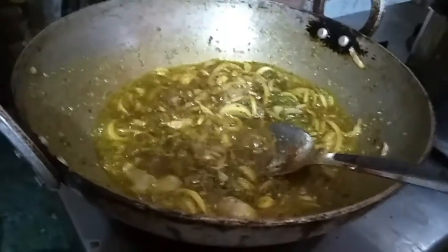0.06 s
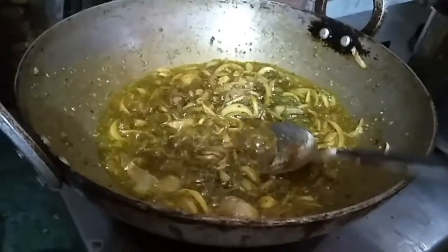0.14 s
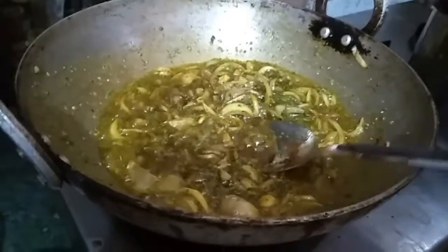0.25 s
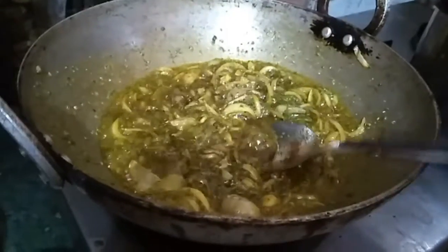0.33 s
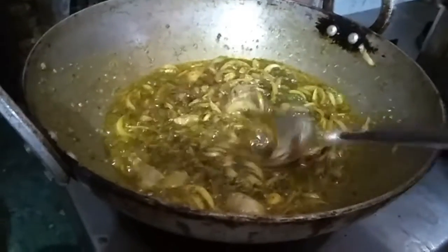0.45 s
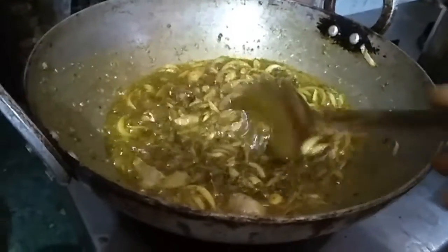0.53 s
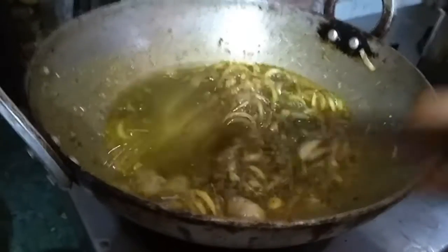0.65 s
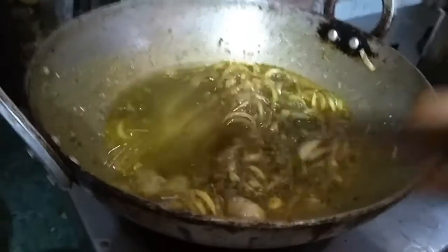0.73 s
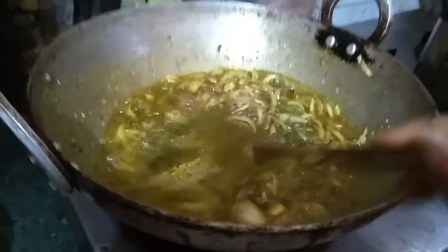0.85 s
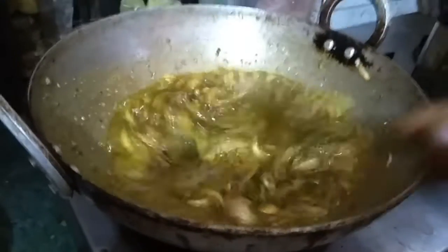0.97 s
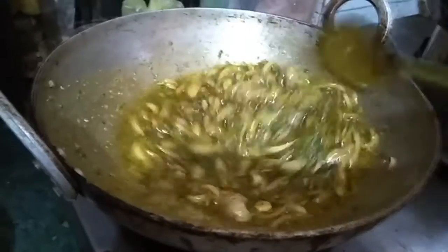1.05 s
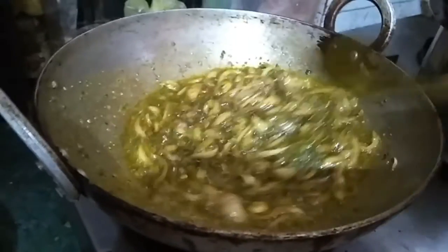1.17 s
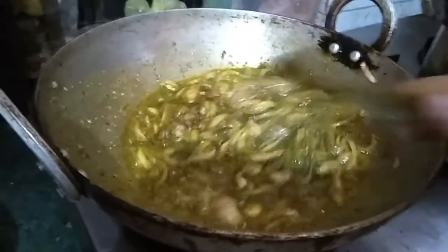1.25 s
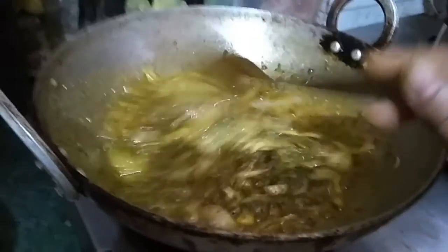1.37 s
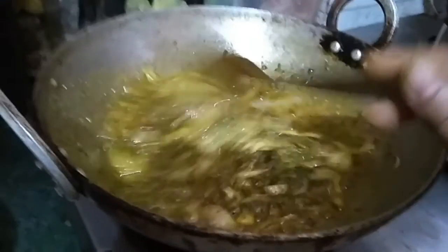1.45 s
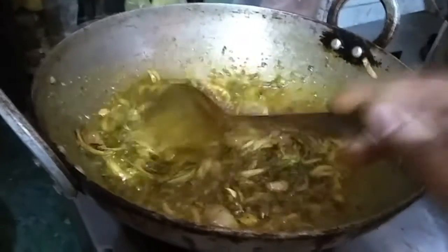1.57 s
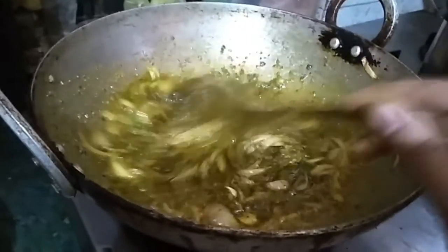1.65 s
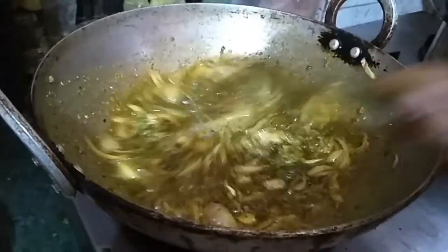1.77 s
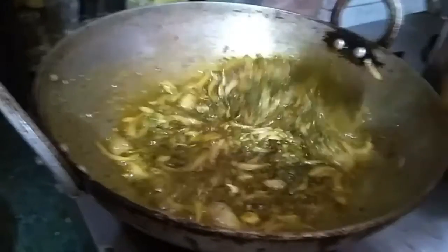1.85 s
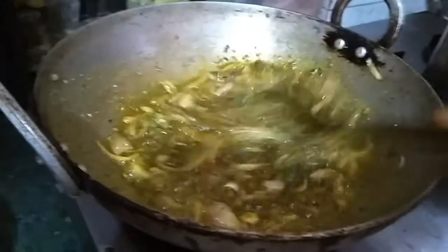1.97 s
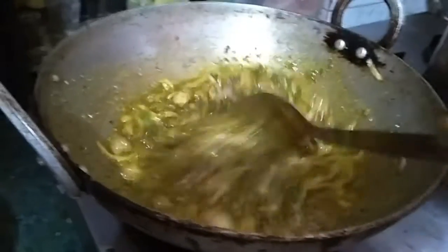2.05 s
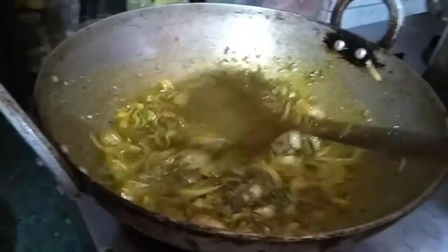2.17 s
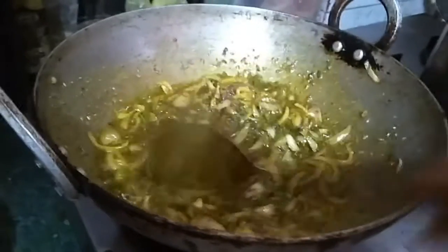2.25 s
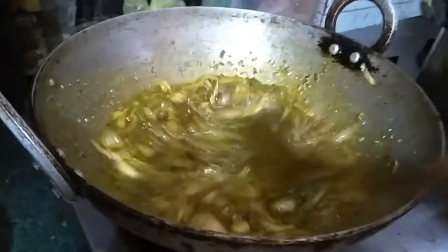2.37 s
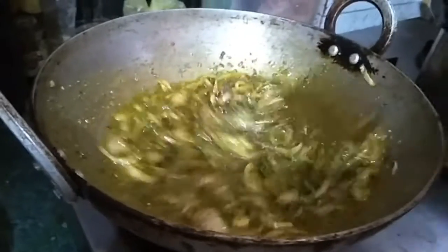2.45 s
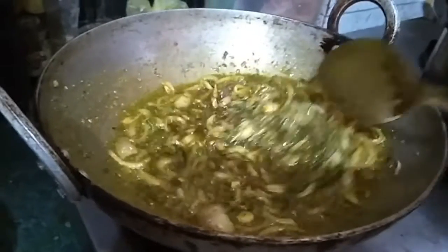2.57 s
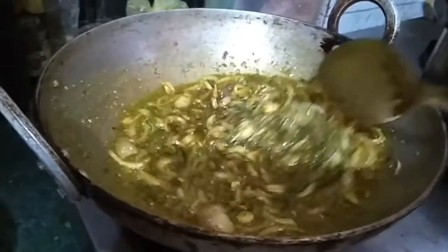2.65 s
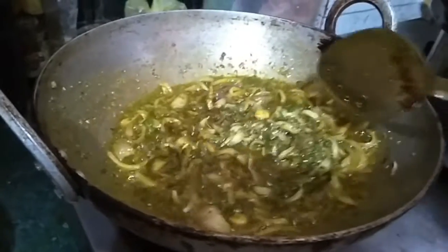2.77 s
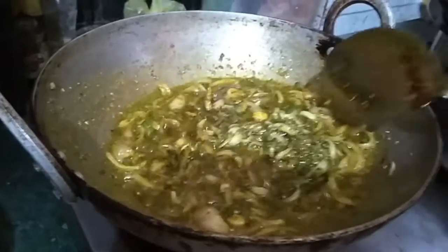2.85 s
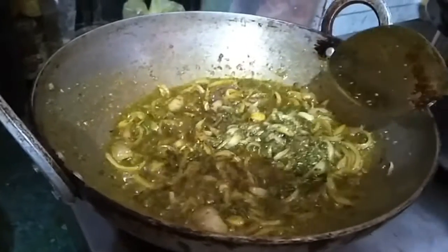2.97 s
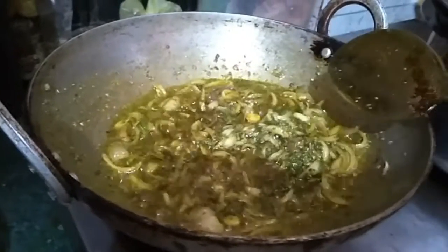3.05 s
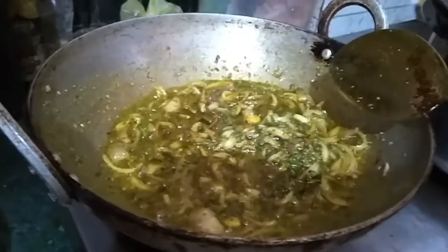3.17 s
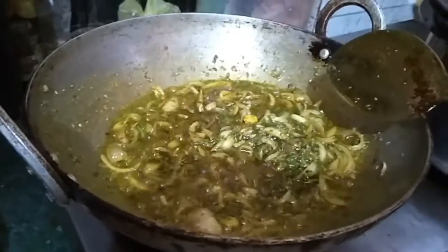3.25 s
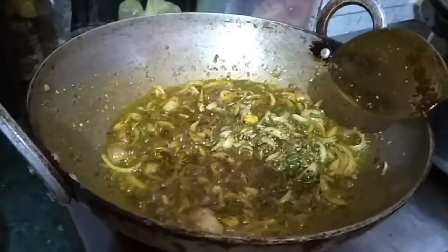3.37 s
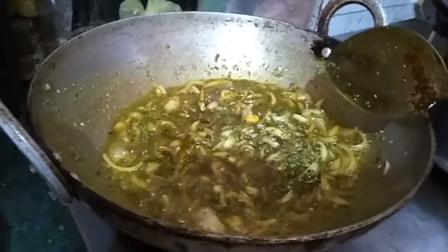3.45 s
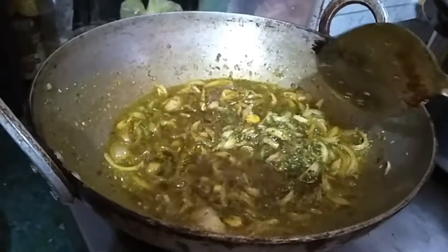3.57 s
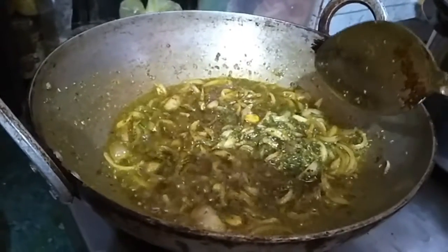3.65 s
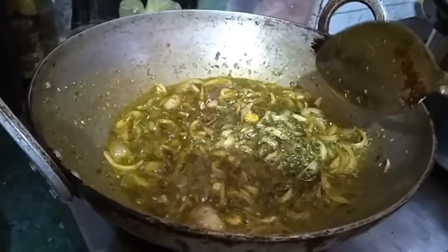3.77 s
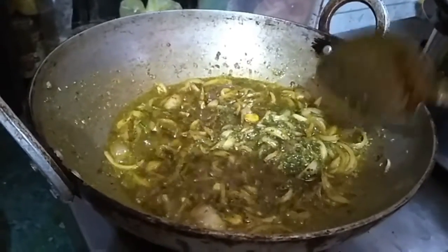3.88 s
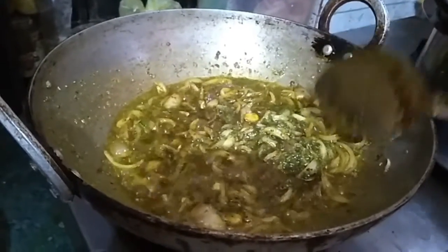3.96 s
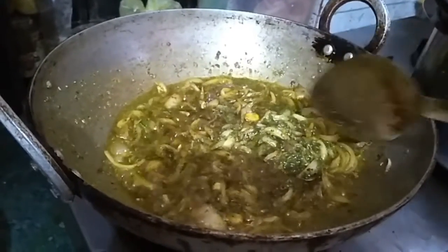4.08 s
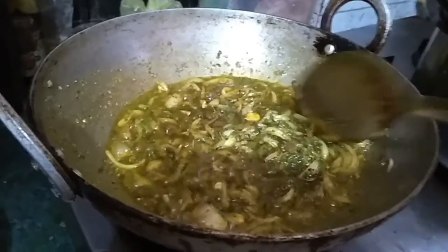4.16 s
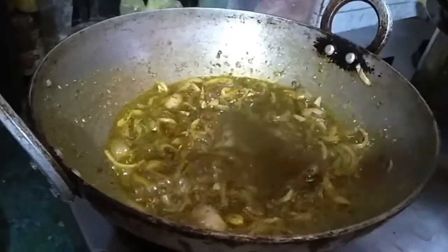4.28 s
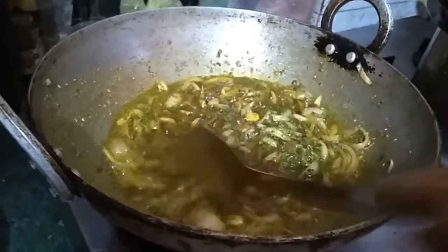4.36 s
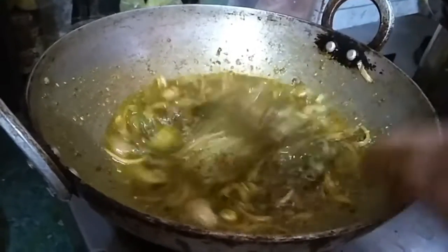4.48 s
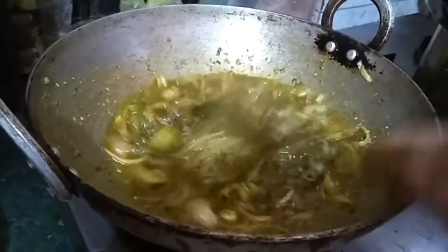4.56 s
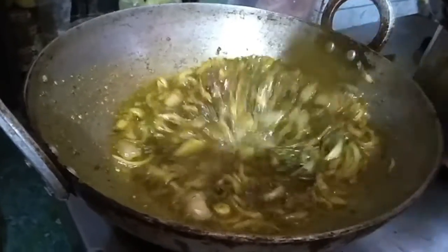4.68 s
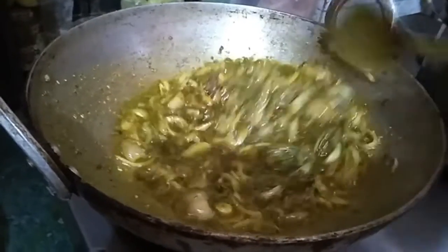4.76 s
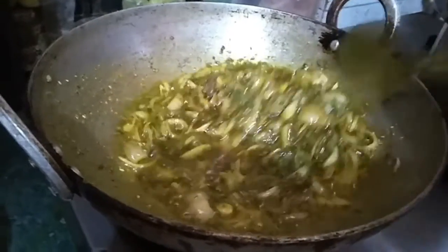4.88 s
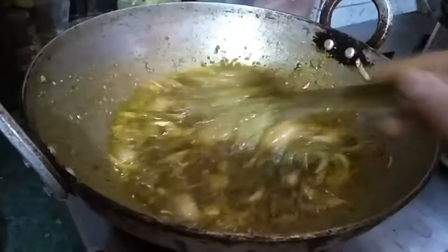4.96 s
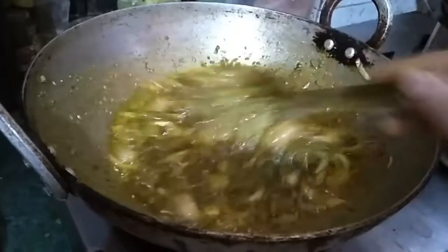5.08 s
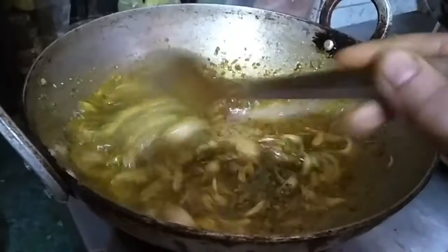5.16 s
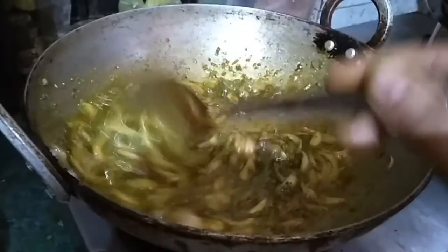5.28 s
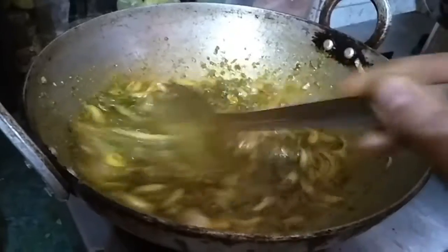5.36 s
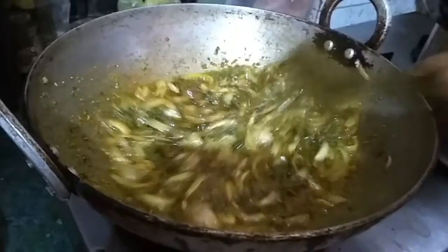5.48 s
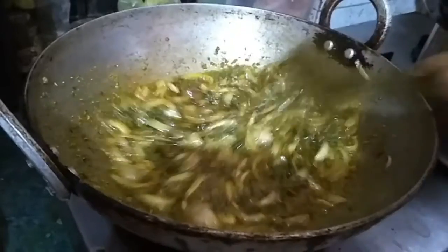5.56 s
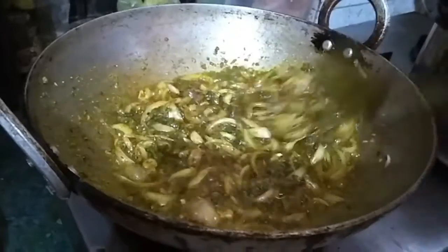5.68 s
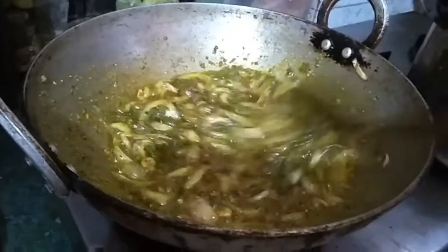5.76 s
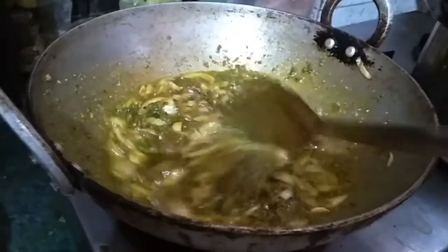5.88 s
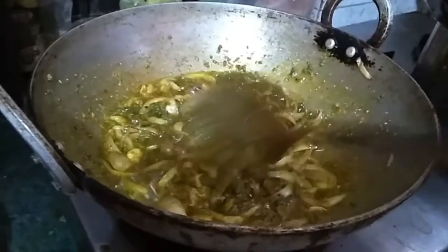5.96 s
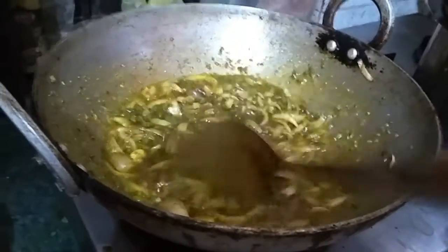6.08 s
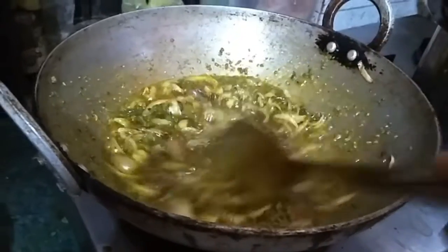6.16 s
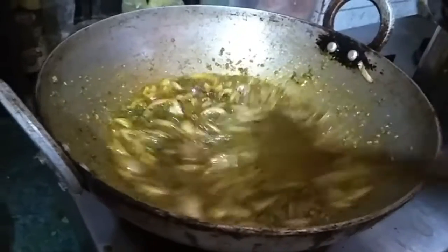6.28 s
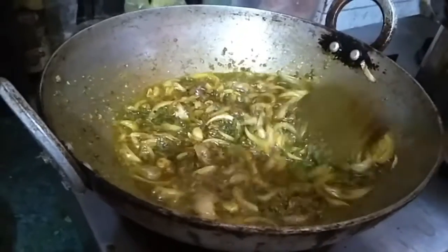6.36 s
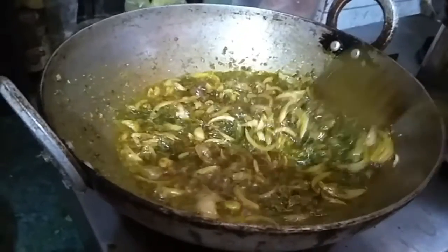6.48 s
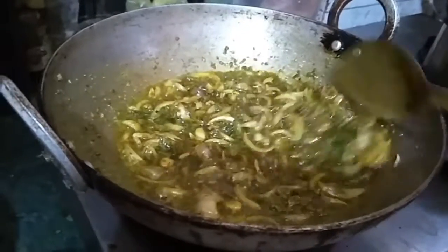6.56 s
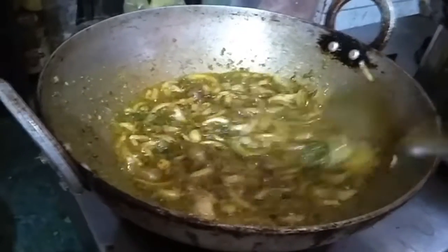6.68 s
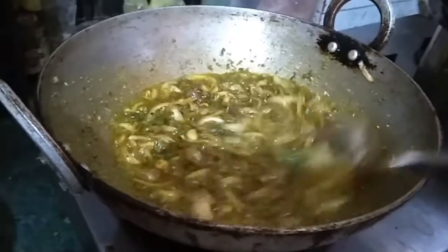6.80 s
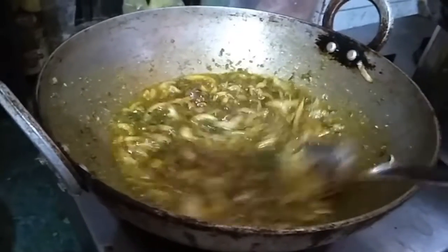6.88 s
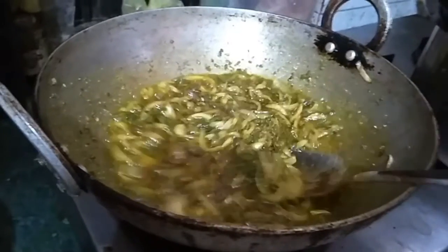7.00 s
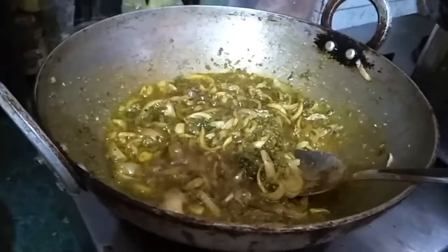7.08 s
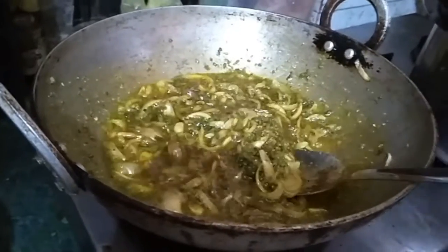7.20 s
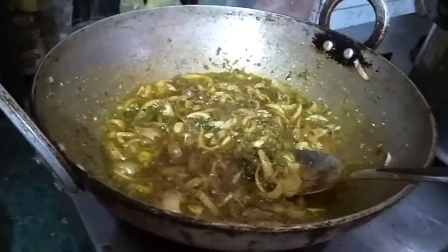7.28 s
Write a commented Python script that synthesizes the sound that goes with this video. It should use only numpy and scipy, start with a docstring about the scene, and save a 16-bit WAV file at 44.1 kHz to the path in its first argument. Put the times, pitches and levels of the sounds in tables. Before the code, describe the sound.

Close, wet frying hiss with popping oil and bubbling, broken by spoon knocks, short metallic scrapes and low wok thumps in a small kitchen.

```python
"""A small kitchen, with a phone close to a steel wok: sliced onions fry while a metal spoon stirs them.
Random impulses shaped by spectra make the fizz and crackle; short sines make blisters and gurgles; resonances
in the bowl make the simmer, and filtered snaps the spits of oil and small ticks. Turned onions freshen the sizzle.
The spoon thuds through the onions and rings the wok as decaying modes; trains of slips make its drags, grainy
ticks and grinds. It squeaks once, and the wok booms, judders and faintly rumbles on its burner."""
import sys
import numpy as np
from scipy import signal
from scipy.fft import rfft, irfft, next_fast_len
from scipy.io import wavfile
from scipy.ndimage import uniform_filter1d

SR = 44100
rng = np.random.default_rng(int(sys.argv[2]) if len(sys.argv) > 2 else 0)


def unload_audio(sound):
    """Save the sound as a 16-bit wav file, at the path given as the first command line argument."""
    columns = np.transpose(np.atleast_2d(sound))
    # keep every value between -1 and 1, then stretch to whole-number steps
    steps = np.round(np.clip(columns, -1, 1) * 32767)
    wavfile.write(sys.argv[1], SR, steps.astype(np.int16))


N = 323253
T = np.arange(N) / SR
# frequency grid for colouring, padded by a second
SIZE = next_fast_len(N + SR)
HZ = np.maximum(np.arange(SIZE // 2 + 1) * SR / SIZE, 1)


def undb(db):
    """Decibels to gain."""
    return 10 ** (np.asarray(db) / 20)


def unit(x):
    """Scale to rms 1."""
    return x / np.sqrt(np.mean(x ** 2))


def panned(db):
    """Left and right gains of mean power 1 for a left-minus-right level."""
    return unit(undb(np.array([[db], [-db]]) / 2))


def add(out, s, x):
    """Mix x into out from time s on."""
    start = max(int(s * SR), 0)
    out[..., start:start + x.shape[-1]] += x[..., :max(N - start, 0)]


def colour(x, points):
    """Shape x with a (Hz, dB) spectrum, drawn straight over log frequency; rms 1."""
    hz, db = np.transpose(points)
    gain = undb(np.interp(np.log(HZ), np.log(hz), db))
    return unit(irfft(rfft(x, SIZE) * gain, SIZE)[..., :x.shape[-1]])


def resonance(x, hz, width):
    """Two-pole band-pass; extreme pitches and widths are held in range."""
    q = hz / min(width, SR / 3)
    return signal.lfilter(*signal.iirpeak(min(hz, .45 * SR), q, SR), x)


def fade(t, t60):
    """Exponential decay by 60 dB in t60 seconds."""
    return np.exp(-np.log(1000) * t / t60)


def walk(rate):
    """Slow chance: random levels joined by straight lines, rate of them a second; rms 1."""
    levels = rng.standard_normal(4000)
    return unit(np.interp(T * rate, np.arange(len(levels)), levels))


def dips(rows):
    """Smooth passing drops in level (dB), each a bell curve around its middle."""
    return sum(db * np.exp(-(2 * (T - s) / length) ** 2) for s, length, db in rows)


def grains(rate, spread_db, size):
    """Tiny impulses at random moments, rate a second, with random sign and strength."""
    chance, strength = rng.random(size), np.minimum(rng.exponential(1, size), 5)
    return (chance < rate / SR) * rng.choice([-1, 1], size) * undb(spread_db * strength)


def stroke(length):
    """Smooth pressure of one push or stroke: up, held, down."""
    return np.sqrt(np.hanning(max(int(length * SR), 8)))


def ring(modes, t, lag=0.00011, split=0.0055, twin=0.36):
    """Struck modes, each beating with a close twin; they reach the left microphone lag seconds before the right."""
    both = t - np.array([[0], [lag]])

    def pair(hz):
        main = np.sin(2 * np.pi * hz * both)
        twin_hz = hz * (1 + split * rng.standard_normal())
        return main + twin * np.sin(2 * np.pi * (twin_hz * both + rng.random()))

    return sum(undb(db) * fade(t, t60) * rng.choice([-1, 1]) * pair(hz) * panned(pan_db)
               for hz, db, t60, pan_db in modes)


# how fast the wet faces heat up, then dry off
FLARE_S, DRYING_S = 0.087, 0.51


def flare(rest_db, added_db):
    """Rise in dB of a frying layer over rest: every turn adds steam that swells and dries off."""
    power = 1
    for (s, *_), db in zip(TURNS, added_db):
        age = np.maximum(T - s, 0)
        envelope = np.minimum(age / FLARE_S, 1) * np.exp(-np.maximum(age - FLARE_S, 0) / DRYING_S)
        power = power + undb(db - rest_db) ** 2 * envelope
    return 10 * np.log10(power)


# the pan left to itself: level of each layer
FIZZ_DB, CRACKLE_DB, SIMMER_DB = -48.5, -54, -64.5
# the sizzle's left-minus-right level at rest (dB), and its move to the left per dB of flare
REST_PAN_DB, SPREAD = -10.5, 0.59
# the spoon turns wet onion onto hot steel: start_s, added_fizz_db, added_crackle_db
TURNS = [(0.62, -80, -58), (1.08, -47.5, -54), (1.68, -47.5, -51.5), (2.4, -47, -54), (4.6, -47, -51),
         (5.62, -49, -54), (6.25, -53, -59), (6.85, -51.5, -57)]
# the sizzle sinks briefly, mostly on the left: middle_s, length_s, left_depth_db
LULLS = [(0.652, 0.96, -6.5), (1.254, 0.19, -19.5), (1.62, 0.21, -0.5), (4.544, 0.43, -3.5),
         (5.407, 0.14, -1.5), (6.148, 0.34, -3)]
LULL_RIGHT_SHARE = 0.1


def frying_levels():
    """Fizz level, crackle level and left-minus-right balance over time, in dB, as turns flare and lulls pass."""
    _, fizz_added, crackle_added = np.transpose(TURNS)
    fizz, crackle = flare(FIZZ_DB, fizz_added), flare(CRACKLE_DB, crackle_added)
    lull = dips(LULLS)
    both = LULL_RIGHT_SHARE * lull
    pan_db = REST_PAN_DB + SPREAD * fizz + lull - both
    return FIZZ_DB + fizz + both, CRACKLE_DB + crackle + both, pan_db


# spectrum of the finest steam bubbles: pitch_hz, level_db (per Hz)
FIZZ = [(3000, -15.5), (4000, -8), (5000, -2.5), (6600, -2), (7500, -6), (8500, -2), (10400, 1),
        (11200, 0.5), (12200, 1.5), (14000, -1.5), (16000, -3.5)]
# spectrum of the bigger bubbles: pitch_hz, level_db (per Hz)
CRACKLE = [(200, -24), (450, -24), (700, -29), (1030, -16), (1260, -5.5), (1750, -5.5), (2200, -1.5),
           (3000, -3.5), (3600, -7), (4100, -20), (8000, -27.5)]
# the wok's far wall colours the sizzle at the left microphone: pitch_hz, gain_db
FAR_WALL = [(900, 3.5), (1250, 7.5), (1630, 2.5), (1850, -4), (2020, -14), (2170, -6), (2450, 2), (2900, 2),
            (3250, -19), (3550, 7.5), (3900, -5), (4480, 11.5), (4800, 2.5), (5200, 1), (9000, 1),
            (16000, -5.5)]


def sizzle(fizz_spread_db=2.5, crackle_spread_db=-0.25, crackle_rate=1800, sputter_db=0.85, sputters_per_s=18):
    """Tiny steam bubbles fizz, faster as wet faces meet the metal; bigger ones crackle in uneven flurries."""
    fizz_db, crackle_db, pan_db = frying_levels()
    activity = undb(fizz_db - np.mean(fizz_db))
    # more bubbles are louder already; the square root takes that back so fizz_db sets the level
    fizz = colour(grains(9000 * activity, fizz_spread_db, (2, N)), FIZZ) / np.sqrt(activity)
    fizz = fizz * undb(fizz_db + 0.6 * walk(30))
    crackle = colour(grains(crackle_rate, crackle_spread_db, (2, N)), CRACKLE)
    crackle = crackle * undb(crackle_db + sputter_db * walk(sputters_per_s))
    left, right = fizz + crackle
    return np.array([colour(left, FAR_WALL) * np.std(left) * undb(pan_db), right])


def blisters(level_db=-7, hz=2100, scatter=0.362, cycles=24, spread_db=2.0, count=1500):
    """Oil blisters on the onion burst one by one, each a tiny pitched tick; level_db is relative to the crackle."""
    out, t = np.zeros((2, N)), T[:SR // 25]
    _, crackle_db, pan_db = frying_levels()
    strengths = np.minimum(rng.exponential(1, count), 4)
    draws = zip(rng.uniform(0, T[-1], count), strengths, rng.standard_normal((count, 2)))
    for when, strength, (pitch, phase) in draws:
        f = hz * np.exp(scatter * 2 * np.tanh(pitch / 2))
        # opposite phase shifts left and right make each tick wide
        tick = np.sin(2 * np.pi * f * t + np.array([[phase], [-phase]]))
        add(out, when, undb(spread_db * strength) * fade(t, cycles / f) * tick)
    return unit(out) * undb(level_db + crackle_db + np.array([pan_db, 0 * pan_db]))


# hollow of the bowl above the oil: pitch_hz, width_hz (of the narrower of two band-passes), level_db
BOWL = [(650.5, 34.6, 5), (760.6, 48, 8), (848, 29, 5.5)]
# the simmering pauses: middle_s, length_s, depth_db
SIMMER_PAUSES = [(0.45, 0.33, -0.5), (4.4, 0.4, -4.5), (4.92, 0.23, -9), (6.09, 0.073, -15)]


def simmer(rate=220, spread_db=1.5, apart=0.7, stir_share=0.96, surge_db=1.5, surges_per_s=9):
    """Bubbles in the oil sound the hollow of the bowl: a soft burble that surges at random and grows with stirring."""
    pops = grains(rate, spread_db, N) + apart * grains(rate, spread_db, (2, N))
    burble = sum(undb(db) * resonance(resonance(pops, hz, width), hz, 4 * width) for hz, width, db in BOWL)
    stirred_db = frying_levels()[1] - CRACKLE_DB
    level_db = SIMMER_DB + stir_share * stirred_db + dips(SIMMER_PAUSES) + surge_db * walk(surges_per_s)
    return unit(burble) * undb(level_db) * panned(0.62)


# spectrum of burner and room: pitch_hz, level_db (per Hz)
KITCHEN = [(20, 10), (50, -24), (95, 9), (130, -13), (200, -6.5), (400, -18.5), (1000, 0.5), (4000, -15)]


def kitchen(level_db=-69):
    """Low steady rumble of the burner and the room: coloured noise, partly shared by both sides."""
    noise = rng.standard_normal(N) + 0.5 * rng.standard_normal((2, N))
    return undb(level_db) * colour(noise, KITCHEN) * panned(8.1)


# spits of oil, and small ticks such as the spoon's near 7.25 s:
# start_s, peak_db (before panning), centre_hz, width_hz, left_minus_right_db
SNAPS = [(0.0313, -28.5, 8000, 16000, -5), (1.2002, -24, 13000, 6000, -7),
         (1.5036, -16.5, 2070, 1300, -0.5), (1.5042, -25.5, 9000, 12000, -0.5),
         (1.847, -29, 3000, 3970, -9), (2.252, -31, 2260, 1200, -1), (2.5228, -28, 11000, 7900, -14),
         (3.7679, -28, 12500, 4500, -10), (4.2618, -47, 9000, 9000, -19), (5.9706, -33, 2900, 1200, -5),
         (6.487, -28.5, 11430, 3500, -9), (6.6457, -19, 2660, 3000, -2), (6.8135, -19, 8000, 12100, -7),
         (7.246, -38, 2700, 1510, 2)]


def snaps(tail_db=-32, tail_t60=0.6, faint_db=-37, faint_hz=8000, faint_width_hz=6000, count=14):
    """Each spit of oil or small tick is one sharp snap with a brief echo of the bowl; fainter ones come at random."""
    out, t = np.zeros((2, N)), T[:SR // 8]
    # faint snaps lie within an octave of faint_hz
    faint = [(when * T[-1], faint_db, faint_hz * 2 ** (2 * pitch - 1), faint_width_hz, REST_PAN_DB)
             for when, pitch in rng.random((count, 2))]
    for s, db, hz, width, pan_db in SNAPS + faint:
        echo = fade(t, tail_t60) + 6 * fade(t, 0.0095)
        burst = undb(tail_db) * rng.standard_normal((2, len(t))) * echo
        burst[:, 0] += 1
        snap = resonance(burst, hz, width)
        add(out, s, undb(db) * snap / np.abs(snap).max() * panned(pan_db))
    return out


# big bubbles welling up: start_s, level_db, pitch_hz
GURGLES = [(0.2, -54, 770), (0.655, -54, 645), (2.03, -54.5, 726), (2.15, -47.5, 633), (2.41, -48.5, 626),
           (2.56, -57, 640), (2.87, -55, 733), (3.03, -57.5, 726), (3.19, -60, 590), (3.4, -53.5, 680),
           (4.11, -59.5, 687), (4.64, -55.5, 703), (5.53, -53, 610), (7.04, -56, 644)]


def gurgles(length=.07, scatter=0.074, life=0.068, glide=0.044, count=9):
    """A cluster of large bubbles, each a short blip that rises a little in pitch."""
    out, t = np.zeros(N), T[:SR // 10]
    for s, db, hz in GURGLES:
        for when, pitch in zip(rng.random(count), rng.standard_normal(count)):
            f = hz * np.exp(scatter * pitch)
            tone = np.sin(2 * np.pi * f * t * (1 + glide * t / life))
            blip = tone * fade(t, life) * (1 - fade(t, 0.017))
            add(out, s + when * length, undb(db) * blip)
    return out


# spoon drags, and near 7.2 s two short grainy ticks of the spoon:
# start_s, length_s, level_db, centre_hz, width_hz (of the first band-pass)
DRAGS_AND_TICKS = [(0.671, 0.082, -58, 2280, 900), (1.001, 0.1, -53.5, 288, 190),
                   (1.02, 0.22, -53.5, 229, 80), (1.35, 0.13, -47.5, 1180, 500),
                   (1.566, 0.058, -53, 260, 260), (1.618, 0.084, -65, 233, 140),
                   (1.722, 0.03, -50, 2300, 1800), (1.807, 0.086, -63, 2280, 1800),
                   (1.872, 0.047, -66, 240, 100), (2.281, 0.06, -59, 290, 130),
                   (2.338, 0.11, -60, 203, 110), (5.635, 0.12, -63, 215, 121),
                   (5.911, 0.21, -57.5, 2466, 893), (6.168, 0.18, -58, 256, 88.5),
                   (6.193, 0.21, -57, 775, 520), (7.004, 0.097, -60, 1890, 1370),
                   (7.132, 0.17, -51.5, 2490, 1100), (7.2002, 0.004, -37, 2240, 1900),
                   (7.207, 0.011, -43, 2400, 1900)]


def drags_and_ticks():
    """Slips of the spoon excite one resonance at a time: long trains sound as drags, the shortest as grainy ticks."""
    out = np.zeros((2, N))
    for s, length, db, hz, width in DRAGS_AND_TICKS:
        pressure = stroke(length)
        slips = grains(3000, 5.2, len(pressure)) + .5 * grains(2700, 7.1, (2, len(pressure)))
        contact = unit(resonance(resonance(slips, hz, width), hz, width * 0.34))
        add(out, s, undb(db) * pressure * contact)
    return out


def steel(count=220, spread_db=3, cluster_db=2, size=3):
    """The crowd of close, weak modes of thin steel, sustained; random phases differ at each microphone."""
    lines = np.zeros((2, SR // 2 + 1), complex)
    hz = np.linspace(150, 16000, count) + rng.uniform(-35, 35, count)
    # neighbouring modes are strong or weak together
    cluster = uniform_filter1d(rng.standard_normal(count), size) * np.sqrt(size)
    gain = undb(spread_db * rng.standard_normal(count) + cluster_db * np.clip(cluster, -2, 1))
    lines[:, hz.astype(int)] = gain * np.exp(2j * np.pi * rng.random((2, count)))
    return unit(irfft(lines, SR))


# the spoon's ringing: pitch_hz, level_db (relative)
SPOON_MODES = [(3208, -3), (3534, -7), (4021, -7), (4871, -5), (5138, -5), (5655, -9), (5889, -8),
               (6412, -1), (6670, 0), (7100, -1), (7817, -3), (8591, -6), (9325, -3), (10037, -4),
               (10274, 0), (10677, -4), (11313, -2), (12117, -6), (12629, -6), (13170, -7)]
# its upper modes begin here; ring time falls with pitch to the power of SPOON_DAMPING
SPOON_SPLIT_HZ, SPOON_DAMPING = 9700, 0.61


def spoon_body(x, lift=1.0, width_hz=110):
    """Whatever shakes the spoon is strongest around its modes; the level is kept."""
    modes = sum(undb(db) * resonance(x, hz, width_hz) for hz, db in SPOON_MODES)
    return unit(x + lift * modes) * np.std(x)


def spoon_ring(t, low_db, high_db, split_t60):
    """The struck spoon: lower and upper modes have their own levels; split_t60 holds at SPOON_SPLIT_HZ."""
    modes = []
    for hz, db in SPOON_MODES:
        contact_db = low_db if hz < SPOON_SPLIT_HZ else high_db
        modes.append((hz, db + contact_db, split_t60 * (SPOON_SPLIT_HZ / hz) ** SPOON_DAMPING, 0))
    return ring(modes, t, split=0.00215)


# the wok's ringing: pitch_hz, level_db (relative), t60_s (before the resting spoon damps it), left_minus_right_db
WOK_MODES = [(98.4, -21, 1.14, 2.5), (219, -6.5, 0.67, 3), (267, -11, 0.61, 3), (320, -15.5, 0.59, 12),
             (381, -16, 0.45, 9), (435.4, -5, 0.31, -1), (597, -14, 0.77, -5), (668.6, -5.5, 0.46, 3),
             (878, -13, 0.14, 0), (977.5, -1.5, 0.55, 2), (1220, -4.5, 0.22, -1), (1296, -14, 0.24, 3),
             (1390, -6, 0.074, 4), (1623, -3, 0.16, 1), (1695, 2.5, 0.12, -2), (1936, -2, 0.2, -8),
             (2228, 1, 0.19, -8), (2400, -4, 0.16, -6), (2858, -9, 0.2, 6)]
# spectrum of spoon on steel: pitch_hz, level_db (before each blow's tilt)
CLASH = [(100, 0), (250, 0), (500, -17), (850, -4), (1250, -1), (2300, 2), (3800, -4), (5000, -5),
         (7000, -1), (9000, -6.5), (10400, -12), (11600, -9.5), (15500, -19)]
# spectrum of the blow cushioned by onions: pitch_hz, level_db (per Hz)
THUD = [(60, -34), (200, -18), (330, 4.5), (420, -2), (700, 4), (850, 0), (1050, 0.5), (1600, -14.5),
        (4000, -63)]
# spectrum of the loaded bowl: pitch_hz, level_db (per Hz)
BOOM = [(50, -31), (100, -8), (140, -1.5), (210, 7), (300, -1.5), (420, 0), (700, -7), (1200, -10),
        (2500, -32)]
# a spot reaches modes within about this share of its pitches, and mutes by this much at its centre
SPOT_WIDTH, MUTED_DB = 0.053, -29
# spoon blows: start_s, thud_db, wok_ring_db, lower_spoon_db, upper_spoon_db, clash_db, tilt_db_per_octave,
# first_favoured_hz, second_favoured_hz, lift_db, muted_hz, ring_share (of ring time left by the resting spoon)
KNOCKS = [(0.9328, -33.5, -36.5, -37, -51, -24.5, 1, 1238, 1380, 14.6, 2200, 0.84),
          (1.3338, -32, -35, -48, -38, -32.5, -0.65, 216.6, 1030, 4.5, 1943, 0.99),
          (5.0334, -31.5, -31, -45, -37, -33, -1.5, 2210, 452, 5.2, 1210, 0.91),
          (6.8141, -41.5, -51, -55, -60, -47, -0.86, 434, 1006, 16.5, 2230, 0.71)]


def knocks(lead=0.00784, thud_t60=0.23, plop_db=1.0, plop_hz=620, plop_t60=0.011, spoon_t60=0.34,
           clash_t60=0.25, crack_db=-1.5, crack_t60=0.053, boom_db=-17, boom_t60=0.78):
    """The spoon first thuds through the onions, then meets steel: wok and spoon ring over a wash of dense modes."""
    out, t = np.zeros((2, N)), T[:SR]
    for (s, thud_db, wok_db, low_db, high_db, clash_db, tilt_db,
         first_hz, second_hz, lift_db, muted_hz, ring_share) in KNOCKS:
        soft = rng.standard_normal(SR) + 0.93 * rng.standard_normal((2, SR))
        thud = colour(soft, THUD) * fade(t, thud_t60)
        # the loaded bowl keeps booming after the thud
        boom = undb(boom_db) * colour(soft, BOOM) * fade(t, boom_t60)
        add(out, s - lead, undb(thud_db) * (thud + boom) * (1 - fade(t, .003)) * panned(5))
        # the bowl of the spoon slaps into the oil
        plop = np.sin(2 * np.pi * plop_hz * t) * fade(t, plop_t60)
        add(out, s - lead, undb(thud_db + plop_db) * plop * panned(3.6))
        # the spot that is struck decides which modes answer most
        spots = [(first_hz, lift_db), (second_hz, lift_db), (muted_hz, MUTED_DB)]
        wok = []
        for hz, db, t60, pan_db in WOK_MODES:
            favour_db = sum(spot_db * np.exp(-(np.log(hz / spot) / SPOT_WIDTH) ** 2) for spot, spot_db in spots)
            wok.append((hz, db + favour_db, t60 * ring_share, pan_db))
        add(out, s, undb(wok_db) * ring(wok, t))
        add(out, s, spoon_ring(t, low_db, high_db, spoon_t60))
        # a harder contact is brighter; the first crack and the late scatter have no pitch
        shape = [(hz, db + tilt_db * np.log2(hz)) for hz, db in CLASH]
        wash = colour(spoon_body(steel()), shape) * fade(t, clash_t60)
        crack_and_late = undb(crack_db) * fade(t, crack_t60) + undb(-11.0) * fade(t, 0.76)
        scatter = colour(rng.standard_normal((2, SR)), shape) * crack_and_late
        add(out, s, undb(clash_db) * (wash + scatter) * panned(-0.16))
    return out


# filter over all the grinding: pitch_hz, gain_db (relative)
GRIND = [(300, -17), (800, 0), (1250, 2.5), (2800, 5.5), (3800, -8), (4700, 3.5), (5800, -6), (6900, 5),
         (7600, 0), (8500, 5.5), (10300, 5), (11600, 2.5), (12800, 7), (15500, -3.5)]
# bare metal sliding on metal: start_s, length_s, level_db
GRINDS = [(0.947, 0.059, -36.5), (1.332, 0.013, -27), (1.352, 0.055, -32), (5.032, 0.0093, -24.5),
          (5.1, 0.023, -29), (5.125, 0.03, -34.5)]


def grinds(tail_t60=0.15, tail_db=0, spoon_db=-3, upper_db=0):
    """The spoon's edge sticks and slips on bare steel; every slip rings wok and spoon briefly."""
    out, t = np.zeros((2, N)), T[:SR // 4]
    for s, length, db in GRINDS:
        pressure = stroke(length)
        slips = unit(grains(8000, 3.1, len(pressure))) * pressure
        wok = unit(steel()[:, :len(t)] * fade(t, tail_t60))
        body = wok + undb(spoon_db) * unit(spoon_ring(t, 0, upper_db, tail_t60))
        body *= undb(tail_db) / np.sqrt(np.sum(body ** 2) / 2)
        # the direct click of each slip
        body[:, 0] += rng.choice([-1, 1], 2) * .5
        add(out, s, undb(db) * signal.fftconvolve(slips[None], body))
    return colour(out, GRIND) * np.std(out) * panned(-0.47)


# each blow shakes the stand too: level relative to its thud, and decay
SHAKE_DB, SHAKE_T60_S = -27, 1
# low booms and judders of the wok on its burner; at 3.78 s a faint, long low rumble:
# start_s, boom_db, push_length_s, judder_db, build_up_s (half the time of a 60 dB rise), judder_t60_s
BOOMS_AND_JUDDERS = [(1.581, -49, 0.0031, -51, 0.04, 0.6), (1.649, -47, 0.0051, -45, 0.12, 0.61),
                     (1.794, -53, 0.0054, -51, 0.05, 0.84), (2.286, -37, 0.0045, -47.5, 0.036, 1.7),
                     (2.445, -64, 0.004, -49.5, 0.05, 0.76), (2.631, -55, 0.0054, -64, 0.06, 0.35),
                     (2.945, -71, 0.0063, -60, 0.05, 0.28), (3.78, -68, 0.0045, -67, 0.03, 3),
                     (4.417, -69, 0.004, -68.5, 0.1, 0.7), (5.059, -52, 0.0046, -45.5, 0.02, 0.6),
                     (5.435, -51, 0.0057, -51, 0.018, 2.9), (5.642, -39, 0.005, -46, 0.24, 1),
                     (5.833, -74, 0.0039, -55, 0.08, 0.48), (6.804, -68, 0.0032, -58, 0.088, 0.65),
                     (7.25, -68, 0.004, -67, 0.056, 0.7)]


def judder():
    """Strength of the wok's rattle: it builds up to each table row and blow, and dies away after."""
    shakes = [(s, db, build_up, t60) for s, _, _, db, build_up, t60 in BOOMS_AND_JUDDERS]
    shakes += [(s, thud_db + SHAKE_DB, .02, SHAKE_T60_S) for s, thud_db, *_ in KNOCKS]
    power = 0
    for s, db, build_up, t60 in shakes:
        rise, fall = fade(np.maximum(s - T, 0), 2 * build_up), fade(np.maximum(T - s, 0), t60)
        power = power + (undb(db) * rise * fall) ** 2
    return np.sqrt(power)


# the wok on its burner: pitch_hz, level_db (relative), t60_s
STAND_MODES = [(53, -6, 0.11), (61.8, 3, 0.19), (87, -5, 0.44), (99.2, -0.5, 0.47), (148.3, -6, 0.16),
               (168, -15.5, 0.58), (272, -15, 0.15), (336, -15, 0.25)]


def booms_and_judders(contact_s=0.005):
    """Low modes of the heavy wok on its burner: random soft contacts make it judder, single pushes make it boom."""
    t = T[:SR]
    body = sum(undb(db) * fade(t, t60) * np.sin(2 * np.pi * hz * t) for hz, db, t60 in STAND_MODES)
    body = signal.sosfilt(signal.butter(4, 42, "high", fs=SR, output="sos"), body)
    contacts = np.convolve(grains(300, 0.22, N), stroke(contact_s) ** 2, "same")
    out = unit(signal.fftconvolve(contacts, body)[:N]) * judder()
    for s, db, length, *_ in BOOMS_AND_JUDDERS:
        push = stroke(length) ** 2
        add(out, s, undb(db) * np.convolve(push / push.sum(), body))
    return out * panned(6.1)


# the spoon's edge squeaks once on the oiled steel: moment of its peak, swell and trail time constants
SQUEAK_S, SQUEAK_RISE_S, SQUEAK_FALL_S = 6.16, 0.034, 0.04
SQUEAK_DB, SQUEAK_HZ = -49, 1360


def squeak(waver=0.0031, wavers_per_s=120, rough=0.15):
    """Stick and slip lock into one unsteady tone that swells with the stroke and trails off."""
    age = T - SQUEAK_S
    swell = np.exp(-np.maximum(-age, 0) / SQUEAK_RISE_S - np.maximum(age, 0) / SQUEAK_FALL_S)
    hz = SQUEAK_HZ * (1 + waver * walk(wavers_per_s))
    tone = unit(np.sin(2 * np.pi * np.cumsum(hz) / SR))
    return undb(SQUEAK_DB) * swell * (1 + rough * walk(wavers_per_s)) * tone


def room(x, wet_db=-16, t60=0.64):
    """Diffuse reflections from hard kitchen walls: a noise tail that swells in and dies away."""
    t = T[:SR // 2]
    noise = colour(rng.standard_normal((2, len(t))), [(100, -1.0), (3000, -4.5), (15000, -4.0)])
    tail = noise * fade(t, t60) * (1 - fade(t, 0.22))
    tail = tail / np.sqrt(np.sum(tail ** 2) / 2)
    return x + undb(wet_db) * signal.fftconvolve(x, tail, axes=1)[:, :N]


def scene():
    """Frying and stirring in the kitchen; knocks, grinds, drags and squeak get the room's reflections."""
    frying = sizzle() + blisters() + simmer() + gurgles() + snaps()
    spoon = knocks() + grinds() + drags_and_ticks() + squeak()
    return frying + kitchen() + booms_and_judders() + room(spoon)


TOP_HZ = 15750


def record(dry):
    """The phone cuts the top: a steep low-pass at TOP_HZ."""
    return signal.sosfilt(signal.ellip(12, .2, 80, TOP_HZ, fs=SR, output="sos"), dry)


dry = scene()
out = record(dry)
unload_audio(out)
```